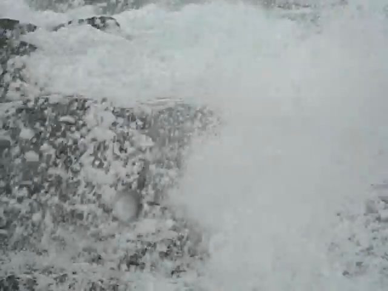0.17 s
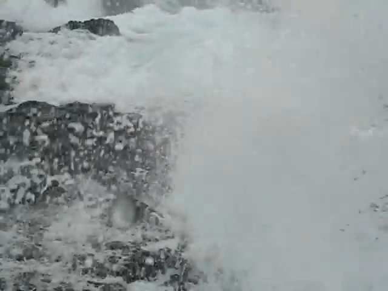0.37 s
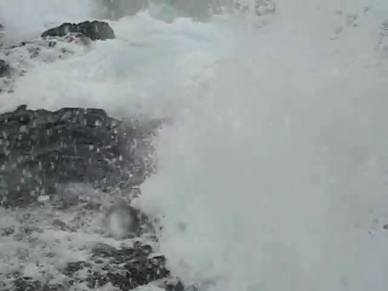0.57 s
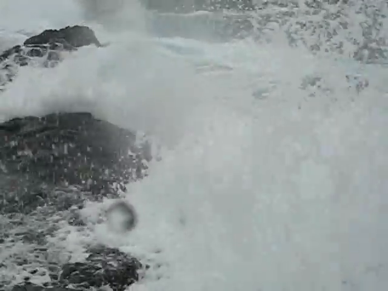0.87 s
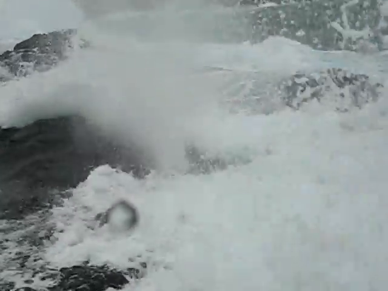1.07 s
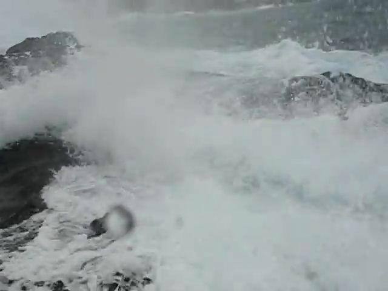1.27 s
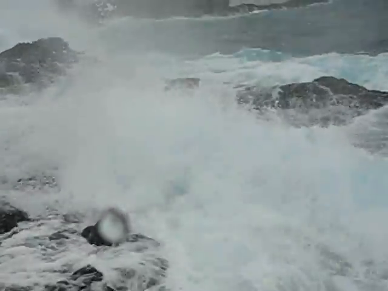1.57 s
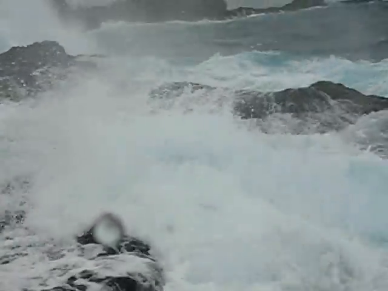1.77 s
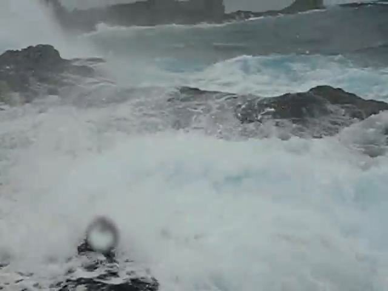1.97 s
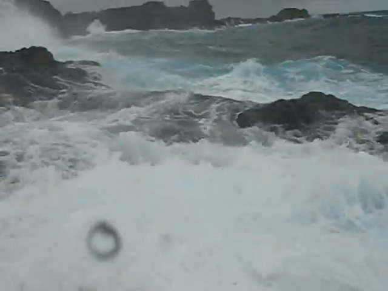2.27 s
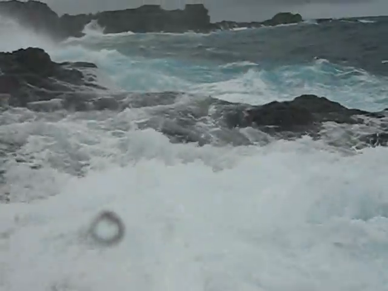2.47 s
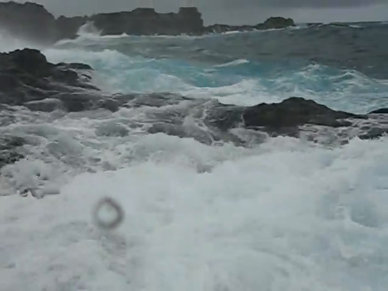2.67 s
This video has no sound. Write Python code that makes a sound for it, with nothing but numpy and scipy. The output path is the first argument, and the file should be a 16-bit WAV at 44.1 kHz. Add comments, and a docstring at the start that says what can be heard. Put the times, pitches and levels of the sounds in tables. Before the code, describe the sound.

Waves crash on rocks right beside a muffled microphone, which a drop hits with a sharp click, briefly lowering the volume. Hissing spray and short splats follow, easing off over a steady roar, with one small surge near the end.

```python
"""Surf bursts over a rocky shore close to a small camera: a low roar, rushing foam and falling spray,
all mono, dull and coloured by the camera case. Almost at once a drop strikes the microphone port;
the gain control ducks and recovers over about a second. Clumps of water keep slapping the rock and
droplets patter down. In the last second foam and spray thin out, with one small surge near the end."""
import sys
import numpy as np
from scipy import signal
from scipy.fft import rfft, irfft
from scipy.io import wavfile
from scipy.ndimage import uniform_filter1d

SR = 44100
rng = np.random.default_rng(int(sys.argv[2]) if len(sys.argv) > 2 else 0)


def store_pcm(level_fs):
    """Save levels as 16-bit WAV."""
    pcm = np.round(np.clip(level_fs, -1, 1) * 32767).astype(np.int16)
    wavfile.write(sys.argv[1], SR, np.atleast_2d(pcm).T)


N = 124362
HIT_S = 0.15405  # the drop lands on the microphone
EDGE_HZ = 6430  # top of the camera's bandwidth
FRAME, HOP = 512, 128  # grain and step of the churning noise, in samples


def amp(db):
    """Decibels to gain."""
    return 10 ** (np.asarray(db) / 20)


def unit(x):
    """Scales to rms 1."""
    return x / np.sqrt(np.mean(x ** 2) + 1e-20)


def fader(points):
    """Gain at every sample from (time [s], level [dB]) points."""
    return amp(np.interp(np.arange(N) / SR, *np.transpose(points)))


def colour(x, points):
    """EQ from (frequency [Hz], gain [dB]) points, scaled so white noise keeps its power in band."""
    hz, db = np.transpose(points)
    bins = np.fft.rfftfreq(2 * N, 1 / SR)
    gain = amp(np.interp(np.log(bins + 1), np.log(hz), db))
    in_band_rms = np.sqrt(np.mean((gain * (bins < EDGE_HZ)) ** 2))
    return irfft(rfft(x, 2 * N) * gain / in_band_rms)[:N]


def wander(shape, rate_hz, width_bins):
    """Smooth random modulation over frames and frequency bins, rms 1."""
    fast = np.fft.fftfreq(shape[0], HOP / SR)[:, None] / rate_hz
    fine = np.fft.fftfreq(shape[1]) * width_bins
    smoothing = np.exp(-fast ** 2 - fine ** 2)
    return unit(np.fft.ifft2(np.fft.fft2(rng.standard_normal(shape)) * smoothing).real)


def churn(patch_db, patch_hz, flutter_db, rate_hz):
    """White noise that churns: patches that come and go, and a flutter shared by all pitches."""
    grains = signal.stft(rng.standard_normal(N), nperseg=FRAME, noverlap=FRAME - HOP)[2].T
    patches = wander(grains.shape, rate_hz, patch_hz * 2 * grains.shape[1] / SR)
    flutter = wander((len(grains), 1), rate_hz, 1)
    grains = grains * amp(patch_db * patches + flutter_db * flutter)
    return unit(signal.istft(grains.T, nperseg=FRAME, noverlap=FRAME - HOP)[1][:N])


def ticks(per_s, spread_db):
    """A random train of tiny clicks, a few much larger than the rest."""
    size = amp(spread_db * np.minimum(rng.exponential(1, N), 4))
    return unit(size * rng.choice([-1, 1], N) * (rng.random(N) < per_s / SR))


def roar():
    """The low bed: breakers tumbling along the shore."""
    # gentle swells of the breakers (time [s], level [dB])
    swells = [(0, -42.5), (0.2, -38.5), (0.5, -41), (0.8, -39.7), (0.97, -42.5), (1.05, -40.6), (1.25, -40),
              (1.45, -42), (1.75, -40), (2, -42.5), (2.4, -43), (2.82, -42)]
    # broad, dark tone of the roar (frequency [Hz], gain [dB])
    tone = [(30, -6), (90, -5.5), (200, 0), (400, 0), (700, -.3), (1000, -1), (2000, -2.5), (5000, -38)]
    tumble = churn(patch_db=0.34, patch_hz=300, flutter_db=0.27, rate_hz=30)
    return fader(swells) * colour(tumble, tone)


def wash():
    """Foam rushing over the rocks, with bursting bubbles in it."""
    # surges of foam (time [s], level [dB])
    surges = [(0, -29), (.03, -29.5), (.14, -30.5), (.19, -34), (.24, -29), (.48, -32), (.67, -31),
              (.97, -34.5), (1.05, -32.5), (1.13, -34.5), (1.2, -29.5), (1.4, -33.5), (1.6, -35.5),
              (1.78, -35.5), (1.83, -39.5), (2.2, -42), (2.56, -42.5), (2.69, -37.5), (2.82, -40.5)]
    # mid-forward tone of the foam (frequency [Hz], gain [dB])
    tone = [(200, -31), (800, -20), (1300, -3), (2200, 1), (2800, -9), (4000, -9), (5200, -17.5),
            (6400, -29.5)]
    foam = churn(patch_db=0.74, patch_hz=900, flutter_db=-0.1, rate_hz=29)
    bubbles = amp(-10) * ticks(per_s=2500, spread_db=4.5)
    return fader(surges) * colour(unit(foam + bubbles), tone)


def spray():
    """Fine mist hissing down and larger droplets pattering."""
    # showers of spray, tailing off (time [s], level [dB])
    showers = [(0, -37), (.13, -32.5), (.19, -35.5), (.3, -33.5), (.47, -29.5), (.62, -32.5), (.8, -35),
               (1, -38), (1.13, -39), (1.23, -35), (1.5, -37.5), (1.62, -39.5), (1.79, -40.5), (1.84, -44),
               (2, -45.5), (2.4, -48.5), (2.82, -47.5)]
    # brighter tone of the spray (frequency [Hz], gain [dB])
    tone = [(500, -14), (1500, -1.5), (2500, -6.5), (3400, 0.5), (4600, -1), (5400, -6.5), (6400, -17)]
    mist = churn(patch_db=1.4, patch_hz=1200, flutter_db=0.35, rate_hz=36)
    patter = amp(-3) * ticks(per_s=1500, spread_db=4.5)
    return fader(showers) * colour(unit(mist + patter), tone)


def slaps():
    """Each clump of water lands on the rock as a short burst of splatter."""
    # clumps hitting the rock (time [s], level [dB], decay [s])
    clumps = [(0.028, -28.5, 0.0091), (.076, -25.5, 0.0064), (.384, -22.5, 0.0064), (0.471, -22, 0.014),
              (.747, -25, .005), (.863, -27.5, .006), (1.024, -29, 0.0099), (1.069, -27.5, .009),
              (1.098, -26.5, .006), (1.169, -24, 0.0092), (1.234, -27.5, .006), (1.365, -26, .005),
              (1.682, -31.5, 0.012), (1.776, -35, 0.0074)]
    # upper-mid smack of a slap (frequency [Hz], gain [dB])
    tone = [(200, -17), (900, -17.5), (1500, 1), (2200, 5), (3400, -7), (4800, -9), (6400, -24)]
    attack_s = 0.00078
    force = np.zeros(N)
    for start, db, decay in clumps:
        age = np.maximum(np.arange(N) / SR - start, 0)
        force += amp(db) * np.minimum(age / attack_s, 1) * np.exp(-age / decay)
    return colour(force * rng.standard_normal(N), tone)


def drop_on_microphone():
    """A drop strikes the microphone: a one-sided pressure spike, then the port rings briefly."""
    spike_width_s, port_hz, port_decay_s = 0.000085, 3360, 0.0016
    t = np.arange(N) / SR - HIT_S
    age = np.maximum(t, 0)
    spike = np.exp(-(t / spike_width_s) ** 2)
    ring = -amp(-11) * np.sin(2 * np.pi * port_hz * age) * np.exp(-age / port_decay_s)
    return spike + ring


def through_case(x):
    """Sound from outside passes the resonances of the camera case."""
    # peaks and dips of the case (centre [Hz], width [Hz], gain [dB])
    bells = [(380, 79, 2.5), (614, 39, 4.5), (896, 118, -5), (1420, 45, 4.5), (1764, 70, 3.1),
             (2222, 233, 4.5), (2570, 92, -2), (3265, 159, 7.5), (3614, 194, 6), (4136, 180, -2.8),
             (4720, 286, 4)]
    hz = np.fft.rfftfreq(2 * N, 1 / SR)
    db = sum(height * np.exp(-((hz - centre) / width) ** 2) for centre, width, height in bells)
    return irfft(rfft(x, 2 * N) * amp(db))[:N]


def gain_control(x):
    """The camera's gain ducks just after a peak, letting the click through, then recovers slowly."""
    threshold_db, recovery_db_per_s, reaction_s = -12.5, 13.5, 0.0047
    t = np.arange(N) / SR
    over_db = np.maximum(20 * np.log10(abs(x).max(0) + 1e-9) - threshold_db, 0)
    held_db = np.maximum.accumulate(over_db + recovery_db_per_s * t) - recovery_db_per_s * t
    duck_db = uniform_filter1d(np.interp(t - reaction_s, t, held_db), size=48)
    return x * amp(-duck_db)


def scene():
    """The sea through the case and the drop straight on the microphone, alike in both channels."""
    mono = through_case(roar() + wash() + spray() + slaps()) + drop_on_microphone()
    return np.array([mono, mono])


def record(dry):
    """The camera's chain: gain control, the wet microphone's offset and a steep high cut."""
    fade_in_s, sag_decay_s = 0.002, 1.5
    t = np.arange(N) / SR
    # the wet microphone sits off centre after the hit and creeps back
    sag = -amp(-39) * (t > HIT_S) * np.exp((HIT_S - t) / sag_decay_s)
    ducked = gain_control(dry) * np.minimum(t / fade_in_s, 1)
    high_cut = 1 / np.sqrt(1 + (np.fft.rfftfreq(2 * N, 1 / SR) / EDGE_HZ) ** 64)
    return irfft(rfft(ducked + sag, 2 * N) * high_cut)[:, :N]


dry = scene()
out = record(dry)
store_pcm(out)
```